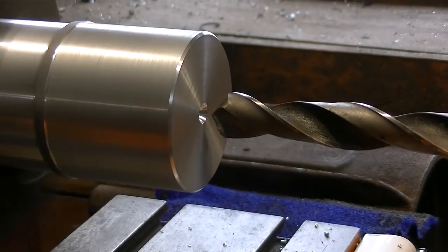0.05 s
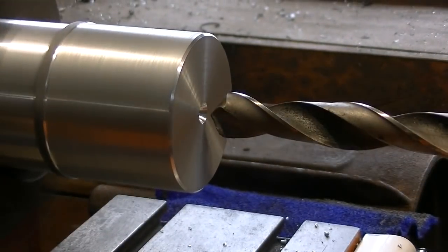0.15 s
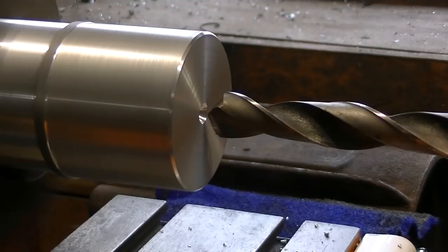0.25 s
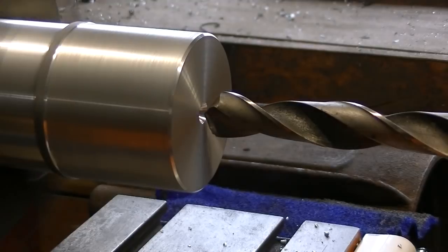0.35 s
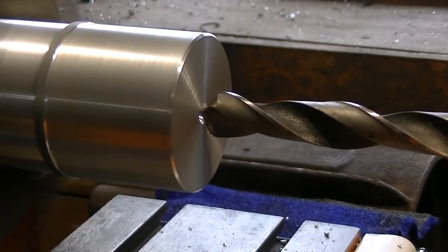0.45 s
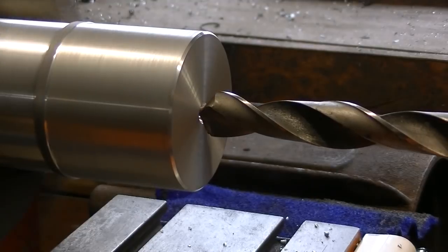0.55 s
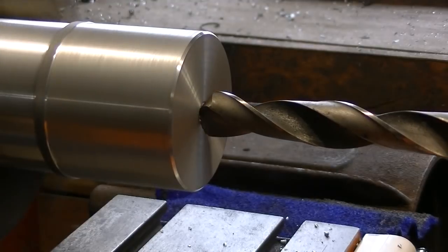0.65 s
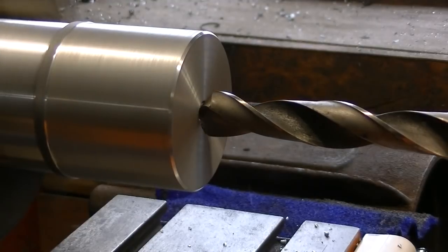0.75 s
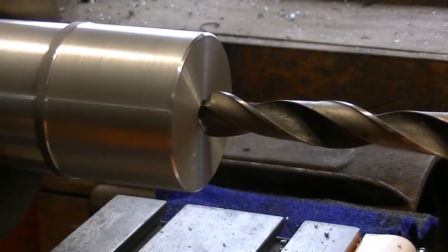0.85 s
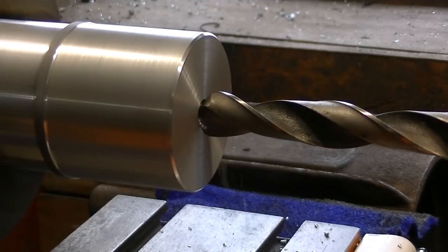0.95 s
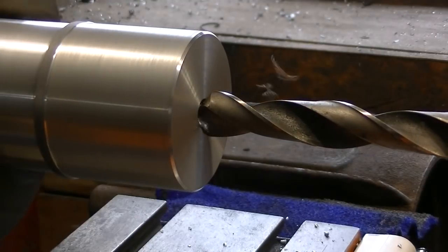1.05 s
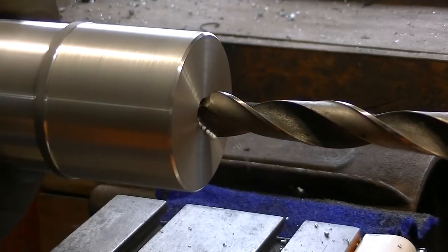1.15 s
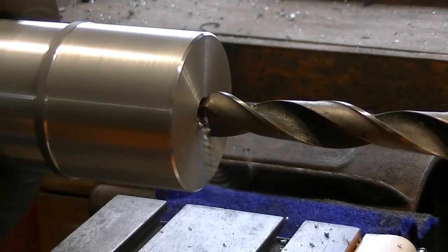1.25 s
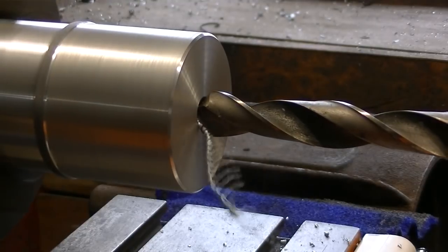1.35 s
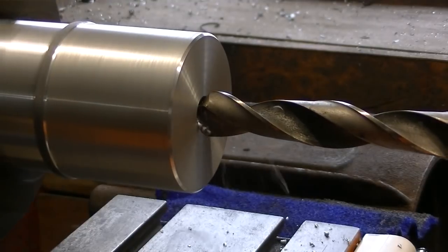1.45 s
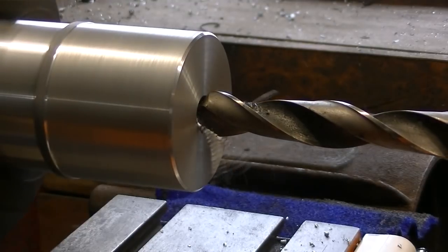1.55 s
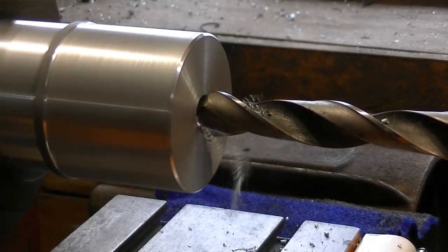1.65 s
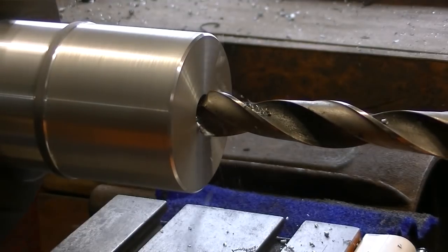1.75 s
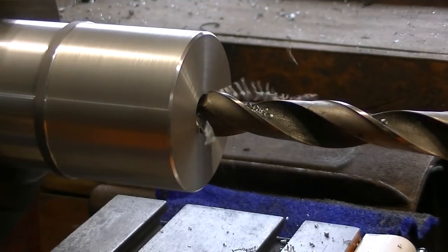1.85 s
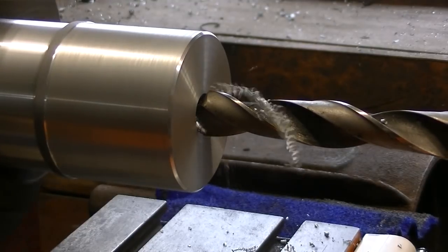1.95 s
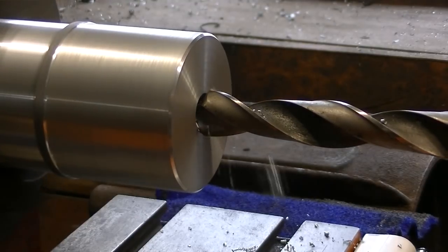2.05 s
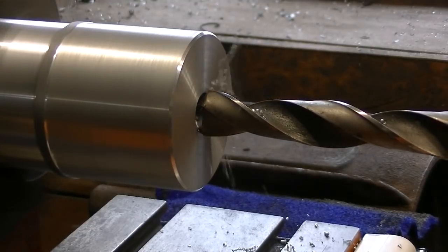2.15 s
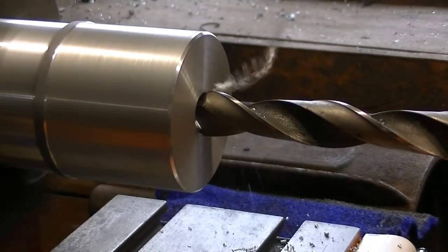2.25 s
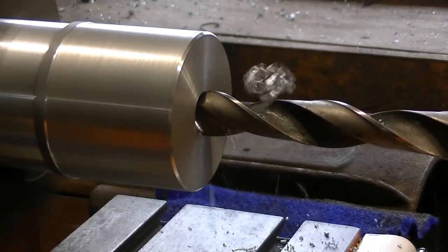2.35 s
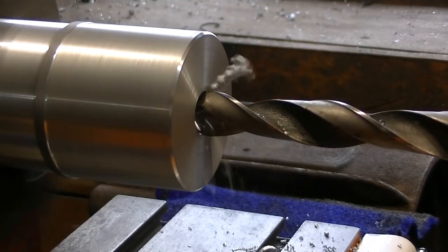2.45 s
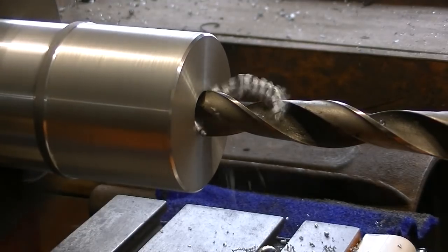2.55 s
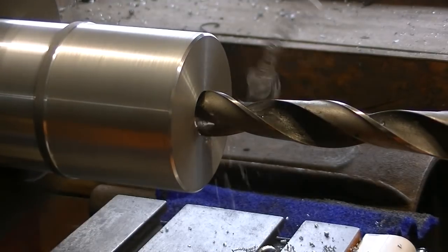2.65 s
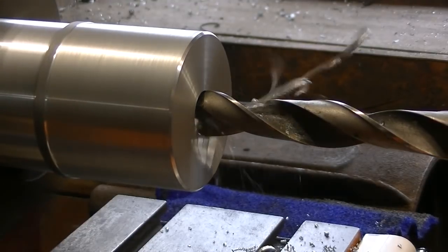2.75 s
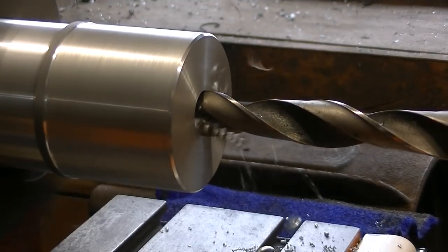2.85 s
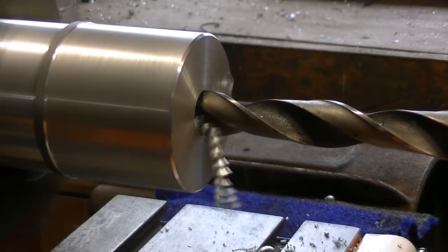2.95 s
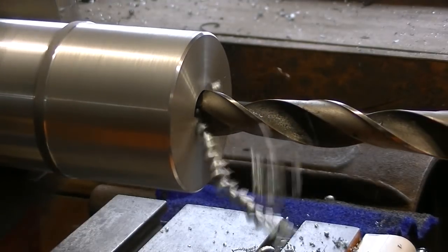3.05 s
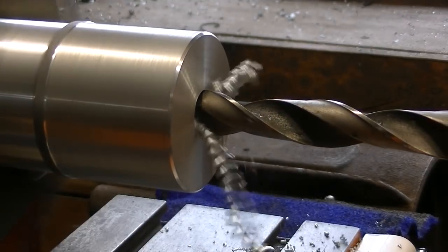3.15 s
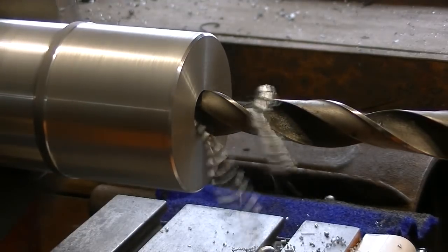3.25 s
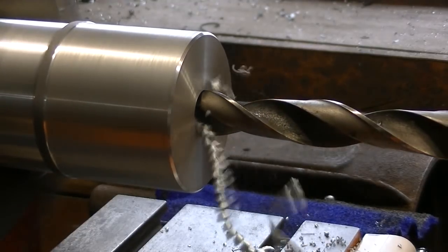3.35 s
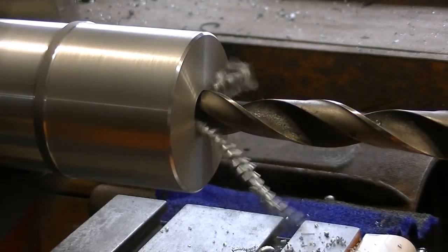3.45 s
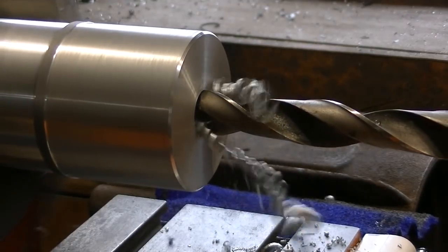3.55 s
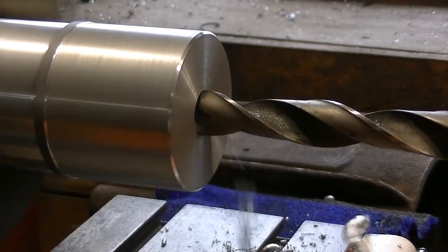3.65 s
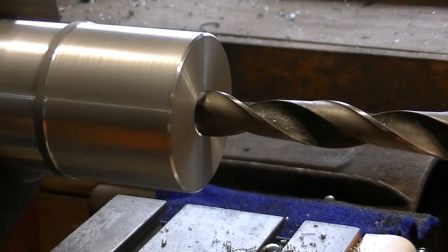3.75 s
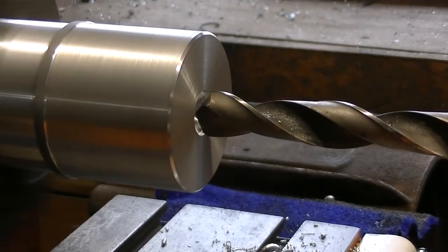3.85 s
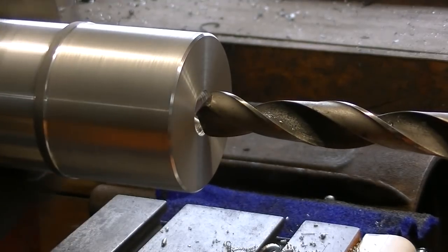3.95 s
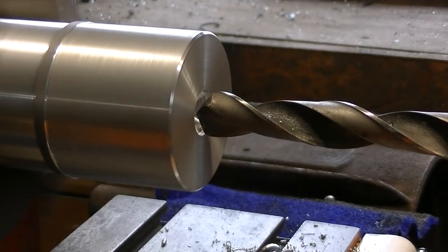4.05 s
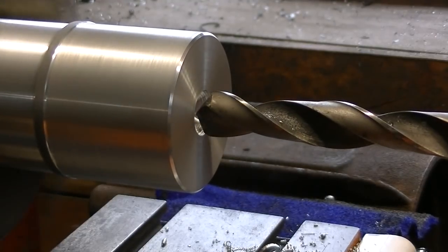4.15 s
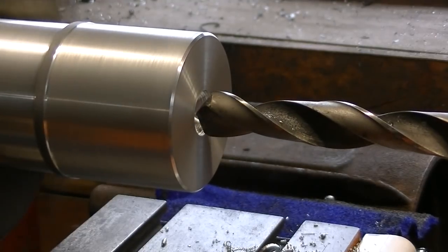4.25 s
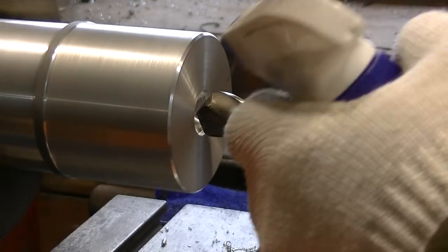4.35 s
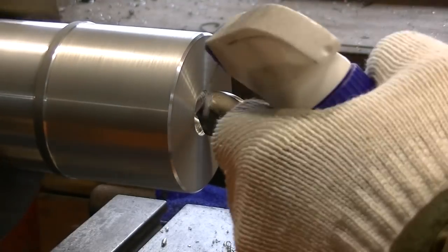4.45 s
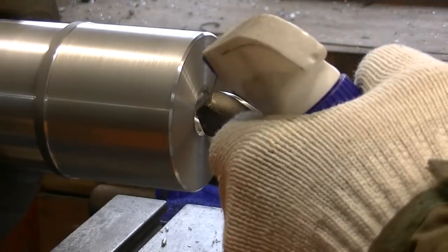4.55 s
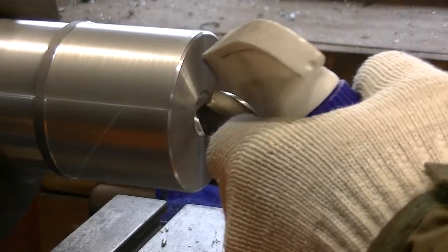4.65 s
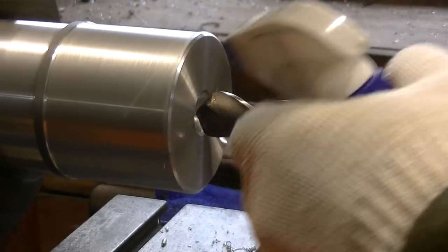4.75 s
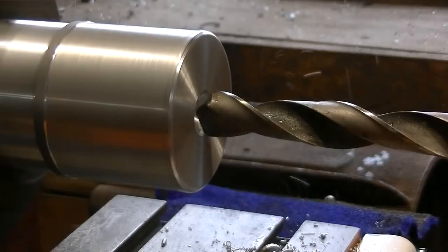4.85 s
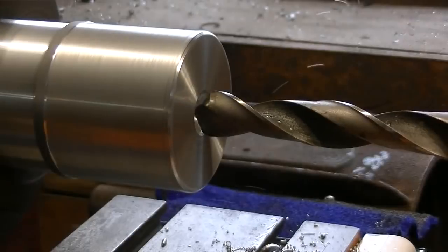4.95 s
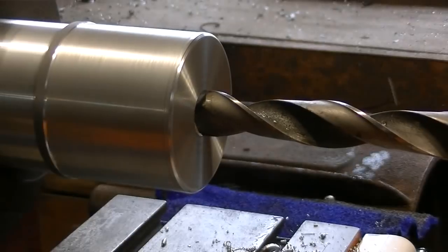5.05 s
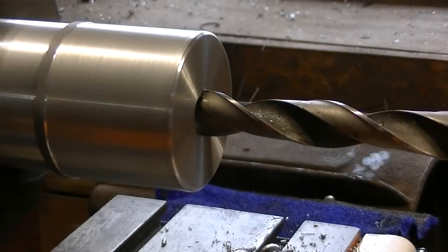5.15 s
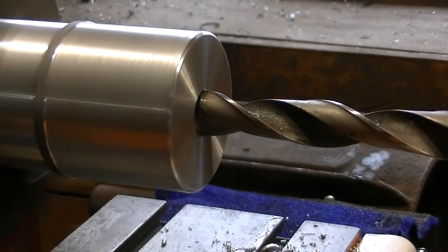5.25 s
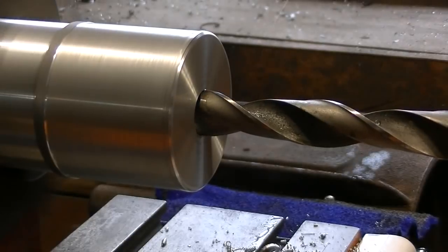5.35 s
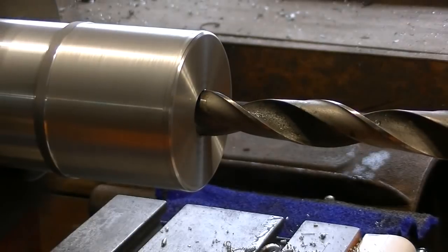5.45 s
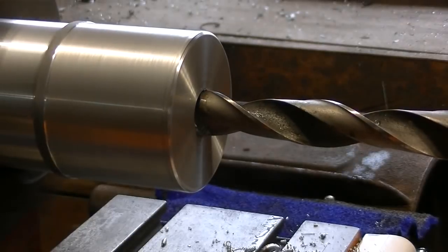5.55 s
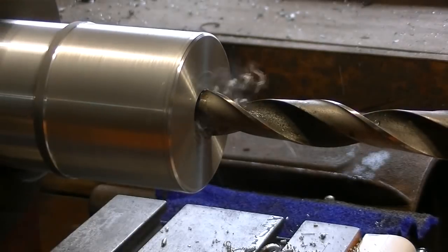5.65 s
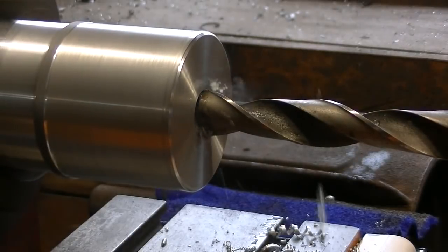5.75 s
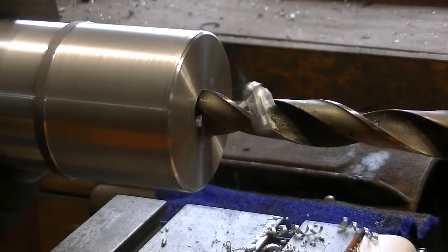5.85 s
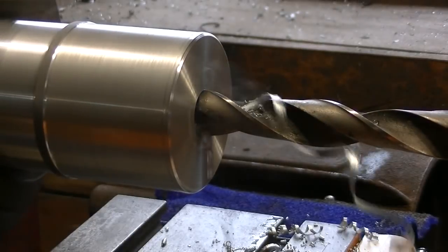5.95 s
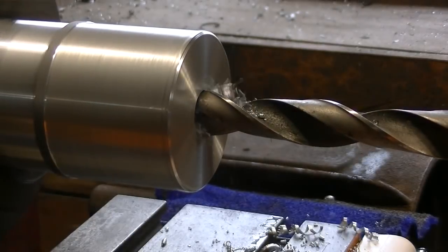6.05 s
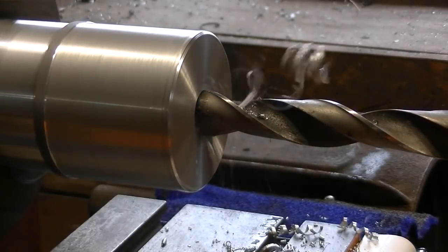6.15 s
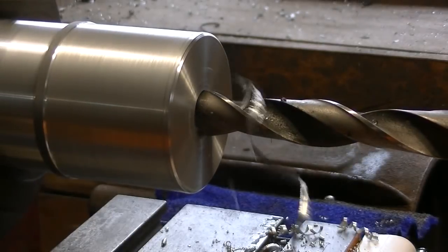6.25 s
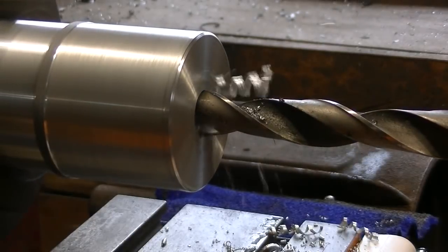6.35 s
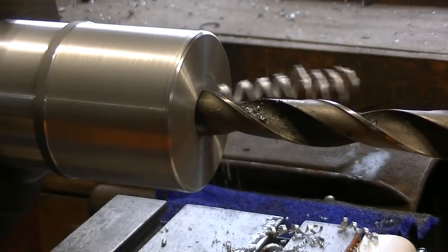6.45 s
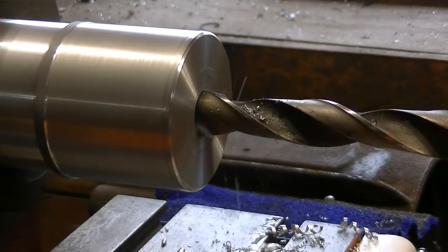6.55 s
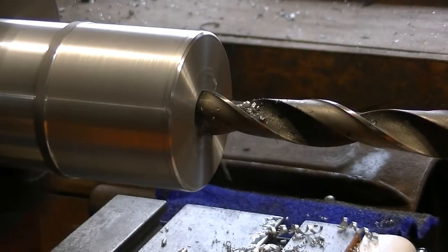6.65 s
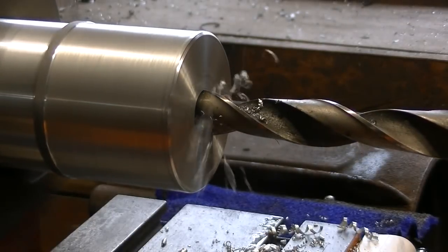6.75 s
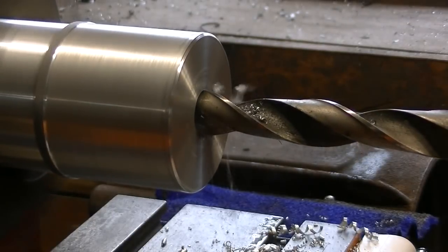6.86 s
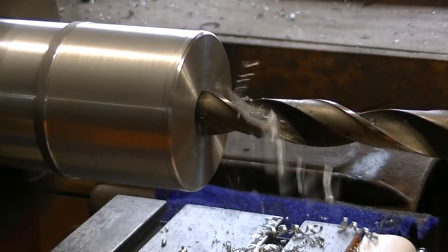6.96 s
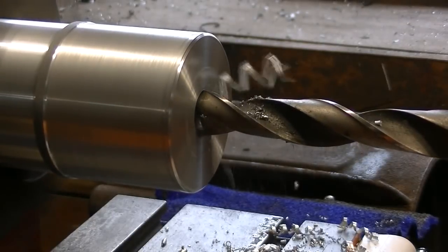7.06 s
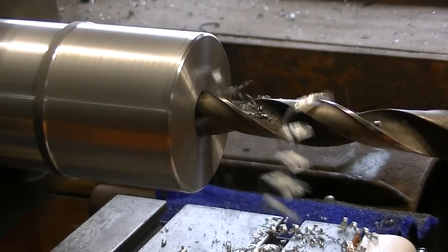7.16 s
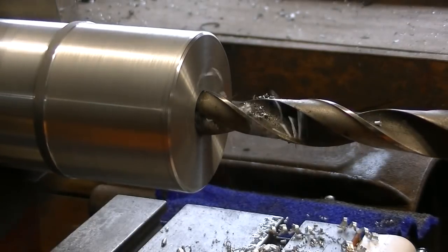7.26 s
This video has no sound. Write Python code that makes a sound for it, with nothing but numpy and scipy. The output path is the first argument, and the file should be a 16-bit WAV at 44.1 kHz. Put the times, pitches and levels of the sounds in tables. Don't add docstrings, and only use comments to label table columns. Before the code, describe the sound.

Close, thin and nearly mono: a lathe's reedy whine and gearbox hiss, with quick ticks of a drill edge touching aluminium. Cutting starts as a gritty scrape with short resonant groans, and grows into a needle-sharp squeal. The drill retreats with a chirp, the machine idles with faint grazing, then rough bursts of squeal return and drop away as the level closes down.

```python
import sys
import numpy as np
from scipy import signal
from scipy.fft import rfft, irfft, next_fast_len
from scipy.io import wavfile
from scipy.ndimage import uniform_filter1d, minimum_filter1d, map_coordinates

SR = 44100
rng = np.random.default_rng(int(sys.argv[2]) if len(sys.argv) > 2 else 0)


def output_pcm(signal):
    pcm = np.clip(np.atleast_2d(signal).T, -1, 1) * 32767
    wavfile.write(sys.argv[1], SR, np.round(pcm).astype(np.int16))


def undo_db(level):
    steps = np.asarray(level, float) / 20
    return 10 ** steps


N = 322371
BITE_S, BACK_OUT_S, REBITE_S = .68, 3.66, 5.46


def unit(x):
    return x / np.sqrt(np.mean(np.abs(x) ** 2) + 1e-20)


def along(points, hz):
    f, v = np.transpose(points)
    return np.interp(np.log(hz + 1), np.log(f + 1), v)


def curves(rows):
    s, *cols = np.transpose(rows)
    return [np.interp(np.arange(N) / SR, s, c) for c in cols]


def since(start_s, fade_s):
    t = np.arange(N) / SR - start_s
    return (t >= 0) * np.exp(-np.abs(t) / fade_s)


def wobble(rate):
    knots = rng.standard_normal(N // 20)
    return map_coordinates(knots, [np.arange(N) * np.clip(rate, .1, 2000) / SR])


def filtered(x, response):
    m = next_fast_len(N + 8192)
    return irfft(rfft(x, m) * response(np.fft.rfftfreq(m, 1 / SR)), m)[..., :N]


def rush(spectrum, modes=(), patchy_db=2.):
    z = signal.stft(rng.standard_normal(N + 512), nperseg=512)[2]
    field = uniform_filter1d(rng.standard_normal(z.shape), size=5, axis=0)
    field = uniform_filter1d(field, size=12, axis=1)
    x = signal.istft(z * undo_db(patchy_db * unit(field)), nperseg=512)[1][:N]

    def colour(f):
        lift = sum(db / (1 + (2 * (f - c) / w) ** 2) for c, w, db in modes)
        return undo_db(along(spectrum, f) + lift)
    return unit(filtered(x, colour))


def band(hz, width_hz, steep=1.0):
    phase = 2 * np.pi * np.cumsum(hz) / SR
    a, b = filtered(rng.standard_normal((2, N)), lambda f: (1 + (2 * f / width_hz) ** 2) ** (-steep / 2))
    return unit(a * np.cos(phase) + b * np.sin(phase))


def angle(mark):
    t = np.arange(N) / SR
    before, after = [rate * t - point for rate, point in mark]
    return 2 * np.pi * np.where(t < BACK_OUT_S, before, after)


# time in seconds, pitch in Hz.
MESH = [(0, 2376), (.65, 2375), (.7, 2368), (2, 2365), (2.3, 2360), (3, 2367), (3.6, 2367), (3.9, 2373),
        (4.3, 2366), (5.2, 2363), (5.5, 2357), (5.7, 2372), (6.2, 2362), (6.6, 2378), (7.31, 2355)]
# turns a second, point of the turn at 0 s.
GEAR_SLACK = [(33.09, .15), (33.09, -.33)]
# time in seconds, feed over idle in dB, shudder of the lathe in dB.
FEED = [
    [(.66, -1.28, -1.2), (.7, 7, 1.5), (.8, 6, 2.1), (1.25, 8, 5.5), (1.8, 10.5, 3.5), (2.06, 4, 3),
     (2.24, 10.5, 3.5), (3.6, 14, 1.4), (3.68, -1.8, 0.9)],
    [(5.1, 0.17, .1), (5.44, 2.5, 2.5), (5.5, 9.5, 2.5), (5.92, 10.5, 0.7), (6.27, 8.5, -0.4),
     (6.64, 6, 1.9), (7.31, 4.5, -0.5)],
]


def gear_whine():
    feed_db = curves(FEED[0] + FEED[1])[0]
    mesh_hz = curves(MESH)[0]
    slack_share = np.clip(1 + np.log(since(BACK_OUT_S, .72) + 1e-9), 0, 1)
    mesh_db = -33.5 - 15.5 * slack_share + 6.5 * since(REBITE_S, .4) + 0.25 * wobble(7)
    mesh_db = mesh_db - 6 * np.exp(-((np.arange(N) / SR - 6.6) / .18) ** 2)
    mesh = 2 * np.pi * np.cumsum(mesh_hz + 2.71 * wobble(14)) / SR
    slack = angle(GEAR_SLACK)
    above = undo_db(-11.5 + .3 * feed_db + 2.2 * wobble(5)) * np.sin(mesh + slack)
    below = undo_db(-16 + .15 * feed_db + 2.1 * wobble(3.54)) * np.sin(mesh - slack)
    whine = unit(np.sin(mesh) - above - below)
    return undo_db(mesh_db + 1.1 * wobble(9)) * (whine + undo_db(-12.5) * band(mesh_hz, 40))


# multiple of the slot pitch, level in dB.
MOTOR_ORDERS = [(0.999, 3.5), (1.169, -8), (1.27, 0), (1.385, 0), (1.757, 13), (1.863, 18), (1.995, 22),
                (2.087, 22), (2.735, 13.5)]
# multiple of the slot pitch, dB per dB of shudder.
SHAKEN = [(1.05, -0.05), (1.15, 1.5), (1.45, 3), (1.6, 0)]


def motor():
    feed_db, shudder_db = curves(FEED[0] + FEED[1])
    freed = since(BACK_OUT_S, .17)
    slot_hz = 628.5 + .3 * feed_db + 25 * freed - 5 * since(BACK_OUT_S, 94)
    slot = 2 * np.pi * np.cumsum(slot_hz) / SR
    hum = np.zeros(N)
    for multiple, db in MOTOR_ORDERS:
        shaken_db = np.interp(multiple, *np.transpose(SHAKEN)) * shudder_db
        level_db = -72.5 + 1.6 * freed - 0.077 * feed_db + db + shaken_db + 1.9 * wobble(6)
        hum += undo_db(level_db) * np.sin(multiple * slot)
    return 1.04 * hum


# frequency in Hz, level in dB per Hz.
CASING = [(330, -66), (560, -81), (586, -51.5), (617, -47), (684, -51), (801, -12.5), (983, -24),
          (1110, -3), (1260, 1.5), (1430, 6), (1590, -9.5), (1670, -2.5), (1900, -15.5), (2470, -31),
          (4180, -120)]
# frequency in Hz, level in dB per Hz.
GEARBOX = [(1400, -120), (1600, -32.5), (2100, -7), (2900, -10.5), (4300, -4.5), (5800, -9.5), (8000, -7),
           (11000, -17), (15700, -25)]
# frequency in Hz, width in Hz, lift in dB.
BOX_MODES = [(4176, 89, 7.5), (4834, 89, 9.5), (5094, 240, 9), (3180, 550, 1), (2690, 42, 4),
             (2120, 180, -3), (3966, 18, 9.5), (5640, 190, 5)]


def casing_and_gearbox():
    shudder_db = curves(FEED[0] + FEED[1])[1]
    casing_db = -48.5 + 1.4 * shudder_db + 0.41 * wobble(9) + 0.43 * wobble(60)
    casing = undo_db(casing_db) * rush(CASING, patchy_db=-0.5)
    gearbox = undo_db(-31.5 + shudder_db + 0.73 * wobble(45)) * rush(GEARBOX, BOX_MODES, patchy_db=1.0)
    return casing + gearbox


def nicks():
    out, t = np.zeros(N), np.arange(120) / SR
    touches = [(.0348 + k * .0299, -16 - .35 * (k - 2.5) ** 2) for k in range(8)]
    for s, db in touches + [(BITE_S + .012, -14)]:
        out[round(s * SR):][:len(t)] += undo_db(db + 2 - 60 * t / 0.0079) * rng.standard_normal(len(t))
    return filtered(out, lambda f: 1 / (1 + (5500 / (f + 1)) ** 4) / (1 + (f / 13500) ** 8))


# frequency in Hz, level in dB per Hz.
SCRAPE = [(4500, -120), (5500, -7), (6500, -0.5), (8000, -2), (10000, -3.5), (12000, -4.5), (14000, -6),
          (15700, -30)]
# frequency in Hz, width in Hz, lift in dB.
DRILL_MODES = [(6340, 150, -10), (7336, 176, 8), (8690, 160, 6.5), (9500, 190, 4), (10300, 140, 5.5),
               (11800, 82, 3.5)]
# frequency in Hz, level in dB per Hz.
FIZZ = [(11000, -120), (12000, -16), (13300, -6), (14200, -4), (15000, -2.5), (15500, 0), (15750, -4)]
# turns a second, point of the turn at 0 s.
LIP_GAP = [(33.5, .6), (33.5, 1.15)]
# turns a second, point of the turn at 0 s.
GRAZE = [(33.6, .26), (33.05, -1.03)]


def cutting():
    feed_db = curves(FEED[0] + FEED[1])[0]
    grit = undo_db(0.16 * np.cos(2 * angle(LIP_GAP)) + 0.67 * wobble(70) + 1.13 * wobble(400))
    scrape = undo_db(-38 + feed_db) * rush(SCRAPE, DRILL_MODES, patchy_db=1.7)
    fizz = undo_db(-44 + 1.72 * np.minimum(feed_db, 10.5)) * rush(FIZZ, patchy_db=0.0)
    graze_db = (1.6 + 2 * since(0, .2)) * np.clip(1 - feed_db / 4.5, 0, 1)
    graze = undo_db(graze_db * (2.0 * np.exp(6 * (np.cos(angle(GRAZE)) - 1)) + 0.5))
    return unit(grit) * (graze * (scrape + fizz) + groans_and_chips())


# time in seconds, level in dB.
SQUEAL = [
    [(.6, -58), (.75, -49), (1.3, -35), (1.6, -24.5), (1.95, -22.5), (2.03, -28)],
    [(2.15, -19), (2.4, -13.5), (2.65, -9.5), (2.83, -12), (2.95, -10), (3.6, -7), (3.67, -19.5),
     (3.715, -54), (3.78, -77)],
    [(5.44, -91), (5.48, -26.5), (5.545, -25), (5.595, -11.5), (5.71, -20.5), (5.745, -13.5), (5.83, -2.5),
     (5.92, -3), (6.012, -19)],
    [(6.021, -6), (6.1, -4), (6.2, -5.5), (6.25, -14), (6.48, -22.5), (6.62, -25), (7.31, -30)],
]
# time in seconds, pitch in Hz.
SQUEAL_HZ = [(2.1, 12750), (2.3, 12430), (2.42, 12340), (3.2, 12315), (3.45, 12260), (3.6, 12290),
             (3.645, 12400), (3.69, 13800), (3.75, 14300), (5.55, 12880), (5.66, 12880), (5.76, 12650),
             (5.85, 12820), (5.95, 12850), (6.02, 12600), (6.2, 12820), (6.4, 12550), (6.6, 12900)]
# level in dB, share of noise from 0 to 1.
LOCKING = [(-28.5, .95), (-14.5, 0.55), (-10.5, 0.15), (1, 0.43)]
# frequency in Hz, level in dB.
TIP_MODES = [(11000, -120), (11500, -8), (12100, -10.5), (12450, 3), (12850, -9), (13300, 1.5), (13900, -7),
             (14600, -18), (15500, -120)]


def squeal():
    db, hz = curves(sum(SQUEAL, []))[0], curves(SQUEAL_HZ)[0]
    chirp = np.abs(np.arange(N) / SR - BACK_OUT_S) < .05
    share = np.clip(np.interp(db, *np.transpose(LOCKING)) * (1 - .6 * chirp), 0, 1)
    turn = angle(LIP_GAP)
    choke = -8 * np.exp(4 * (np.cos(turn) - 1)) * (1 + .35 * wobble(20))
    lobes = 1.8 * wobble(2.73) * np.cos(2 * turn)
    lobes = lobes + 2.2 * np.cos(3 * turn + 1.8 + wobble(1.58)) + 0.5 * np.sin(turn)
    waver = 30 * np.cos(turn) + 45 * np.sin(turn) + 25 * np.sin(3 * turn) + 28 * wobble(260)
    waver = waver * np.clip((hz - 12000) / 330, 1, 2.4)
    tone = np.sqrt(2) * np.sin(2 * np.pi * np.cumsum(hz + waver) / SR) * undo_db(1.6 * wobble(300))
    loose = np.clip(2.5 * (share - .55), 0, 1)
    rough = band(hz + waver + loose * 420 * np.cos(turn - 1.6), 380, steep=1.61)
    spread = .55 * loose
    noise = np.sqrt(1 - spread) * rough + np.sqrt(spread) * rush(TIP_MODES, patchy_db=0.5)
    faint = undo_db(-14) * band(np.full(N, 12860.), 240, steep=1.7)
    faint = faint + undo_db(-41) * band(np.full(N, 11680.), 200, steep=2.2)
    voice = np.sqrt(1 - share) * (1 - loose) * tone + np.sqrt(share) * noise + faint
    return undo_db(db) * unit(undo_db(choke + lobes)) * voice


# middle in seconds, length in seconds, pitch in Hz, level in dB.
GROANS = [(.94, .17, 1380, -38), (.95, .18, 1745, -37), (.98, .2, 1620, -38), (1.22, .14, 1725, -36),
          (1.25, .3, 1395, -40), (1.4, .25, 1965, -33), (1.55, .3, 1610, -41), (1.5, .3, 1405, -40),
          (1.92, .2, 1400, -41), (2.3, .35, 1440, -42), (1.23, .15, 3480, -33)]
# middle in seconds, length in seconds, pitch in Hz, level in dB.
HUMS = [
    (1.12, .3, 870, -58),
    (1.15, .2, 735, -63),
]
# middle in seconds, pitch in Hz, level in dB.
CLIMBS = [
    (1.08, 2060, -35),
    (1.41, 2085, -31),
    (1.64, 2250, -34),
]
# middle in seconds, length in seconds, pitch in Hz, level in dB.
CHIPS = [(.7, .05, 2150, -35), (.695, .03, 1750, -45), (.7, .05, 3550, -36), (3.69, .06, 2400, -41),
         (3.7, .07, 7400, -36), (1.22, .22, 5600, -28), (1.2, .3, 5000, -31), (1.33, .3, 6300, -30),
         (1.38, .15, 5800, -31), (1.23, .15, 8600, -33), (1.75, .5, 6100, -33), (2.25, .3, 2120, -41),
         (2.85, .45, 6150, -28), (2.9, .4, 7300, -29), (6.6, .14, 13450, -30), (5.65, .35, 9900, -32),
         (6.0, .5, 6400, -32), (.8, .25, 14700, -38)]


def groans_and_chips():
    out = np.zeros(N + 2 * SR)
    rows = [(s, length, hz, 0, hz / 23, db) for s, length, hz, db in GROANS]
    rows += [(s, length, hz, 0, 14, db) for s, length, hz, db in HUMS]
    rows += [(s, .26, hz, 210, 140, db) for s, hz, db in CLIMBS]
    rows += [(s, length, hz, 0, 500, db) for s, length, hz, db in CHIPS]
    rasp = unit(undo_db(1.5 * wobble(170)))
    for mid, length, hz, climb_hz, width_hz, db in rows:
        a, b = rng.standard_normal((2, SR))[:, :round((1.6 * length + .1) * SR)]
        u = np.arange(round(1.6 * min(length, .6) * SR)) / (1.6 * length * SR)
        low = signal.butter(2, width_hz / SR)
        a, b = [signal.lfilter(*low, noise)[-len(u):] for noise in (a, b)]
        phase = 2 * np.pi * np.cumsum(hz + climb_hz * (u - .5)) / SR
        ring = unit(a * np.cos(phase) + b * np.sin(phase))
        swell = np.abs(np.sin(np.pi * u)) ** 1.42
        out[round((mid - .8 * length) * SR):][:len(u)] += undo_db(db - 0.2) * ring * swell
    return out[:N] * rasp


# frequency in Hz, side level over middle in dB.
SIDE_DB = [(60, -33), (110, -34), (200, -32), (380, -35), (700, -48), (1290, -51), (2380, -29),
           (4400, -23.5), (8120, -25.5), (15000, -15.5)]


def scene():
    lathe = gear_whine() + motor() + casing_and_gearbox()
    mid = lathe + nicks() + cutting() + squeal()
    side = filtered(mid * unit(wobble(45)), lambda f: undo_db(along(SIDE_DB, f)))
    return np.array([mid + side, mid - side])


# time in seconds, gain in dB.
GAIN = [(0, 0.5), (2.2, 0), (2.7, -3.5), (3.5, -7), (3.63, -5.5), (3.68, 0.7), (3.76, -0.5), (5.7, -0.3),
        (5.82, -5), (5.92, -9.5), (5.99, -4.5), (6.07, -9), (6.35, -11), (6.45, -14), (6.6, -2.5),
        (6.8, -18.5), (7.15, -23.5), (7.31, -21.5)]
# time in seconds, depth in dB.
FLUTTER = [(0, 0), (6.64, 0), (6.69, 10.5), (6.85, 7.5), (6.97, 3.5), (7.31, -1)]


def gain_control():
    t, depth_db = np.arange(N) / SR, curves(FLUTTER)[0]
    hunting = (np.cos(2 * np.pi * 68 * (t - 6.683)) - 1) / 2
    return undo_db(curves(GAIN)[0]) * undo_db(depth_db * hunting + depth_db / 3)


# frequency in Hz, level in dB per Hz.
HUSH = [(20, 0), (300, 0), (600, 3.5), (1200, -17), (2500, -120)]


def microphone_hush():
    return undo_db(-85) * rush(HUSH, patchy_db=0.7)


# time in seconds, peak in dB.
TICKS = [(2.224, -52.5), (2.294, -54), (2.404, -54), (2.683, -54), (2.758, -51.5), (3.004, -60),
         (3.125, -50.5), (3.189, -61), (3.339, -52), (3.517, -51), (5.588, -52), (5.727, -52),
         (5.808, -48.5), (5.928, -50), (6.016, -52), (6.177, -57), (6.225, -58), (6.298, -56), (6.325, -61),
         (6.515, -61.5), (6.545, -60), (6.603, -59), (6.661, -58), (6.75, -64), (6.771, -63)]


def dull_ticks(peak):
    jolts = (rng.random(N) < 95 / SR) * rng.standard_normal(N)
    ticks = jolts * undo_db(-9) * uniform_filter1d(peak, size=4000) ** 3
    lag_s = .011
    for s, db in TICKS:
        ticks[round((s + lag_s) * SR)] = undo_db(db + 31.5)
    return filtered(ticks, lambda f: 1 / (1 + (f / 900) ** 2))


def low_pass(x):
    return signal.sosfilt(signal.butter(12, 15750, fs=SR, output="sos"), x)


def record(dry):
    x = filtered(dry * gain_control(), lambda f: 1 / (1 + (595 / (f + 1)) ** 30))
    peak = -minimum_filter1d(-np.abs(x).max(axis=0), size=40)
    peak = uniform_filter1d(peak, size=30)
    x = x / (1 + (peak / .5) ** 4) ** .25
    added = undo_db([[.33], [-.33]]) * (dull_ticks(peak) + microphone_hush())
    mix = filtered(x + added, lambda hz: hz < 15757)
    return low_pass(mix)


dry = scene()
out = record(dry)
output_pcm(out)
```